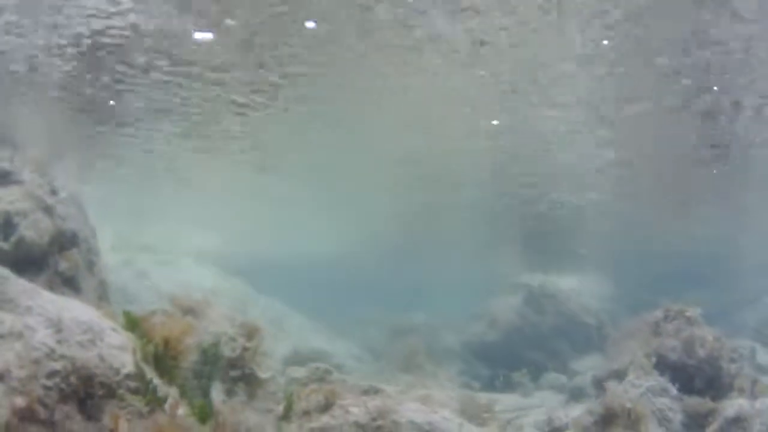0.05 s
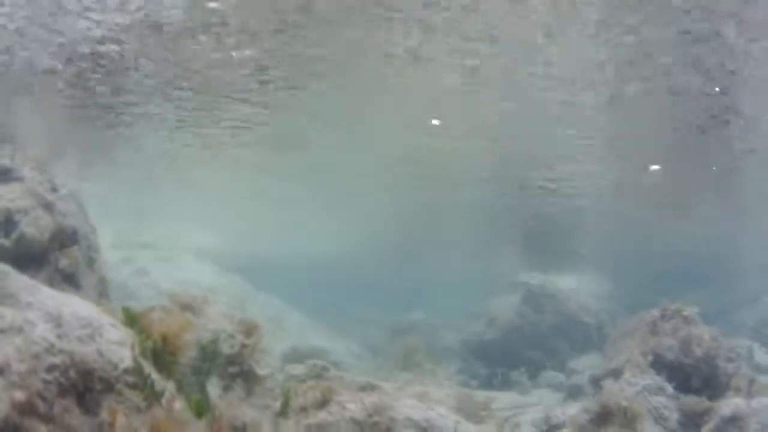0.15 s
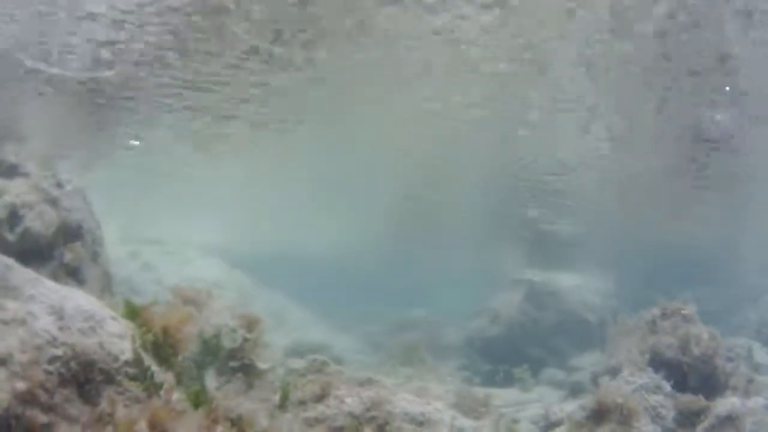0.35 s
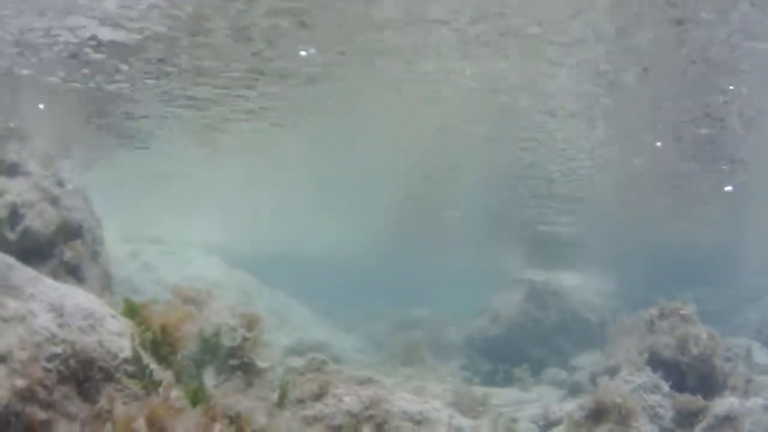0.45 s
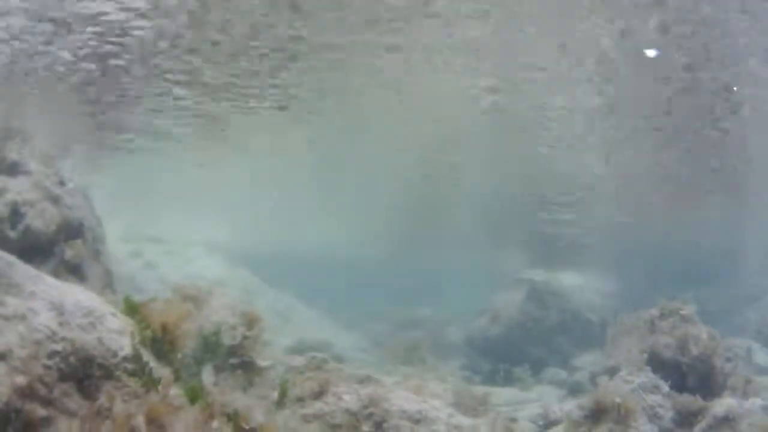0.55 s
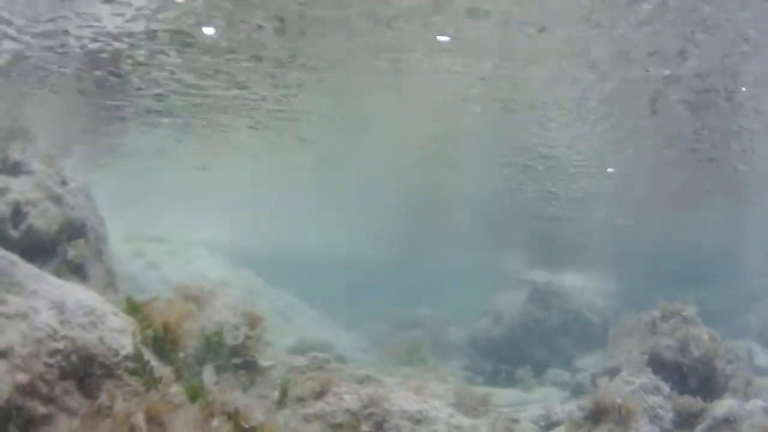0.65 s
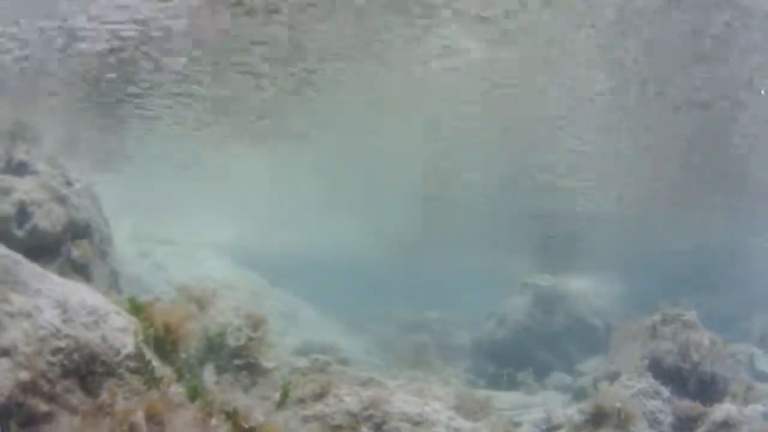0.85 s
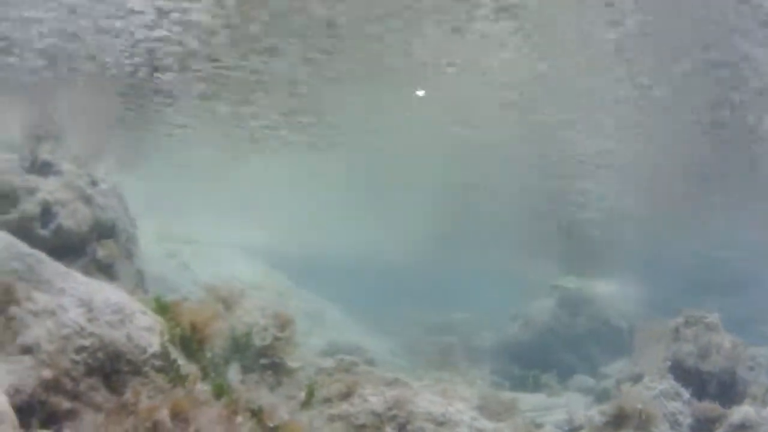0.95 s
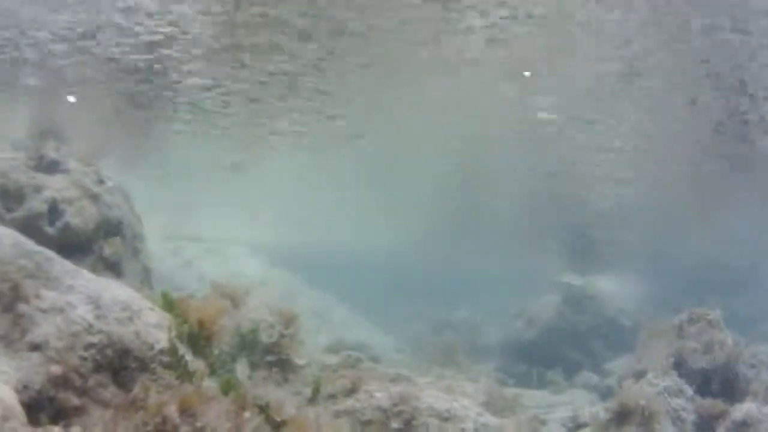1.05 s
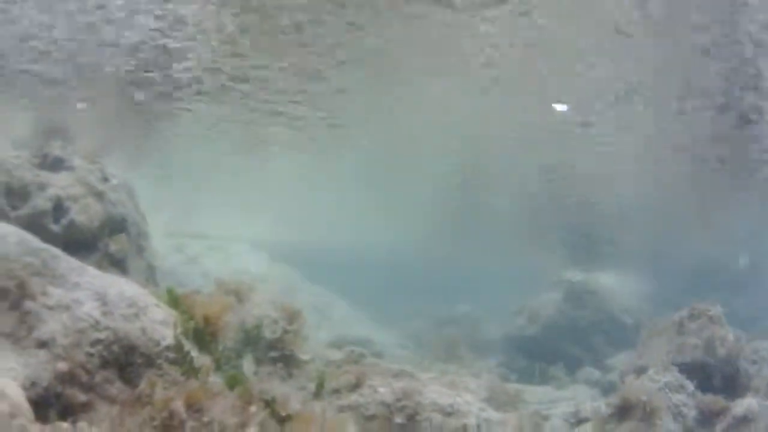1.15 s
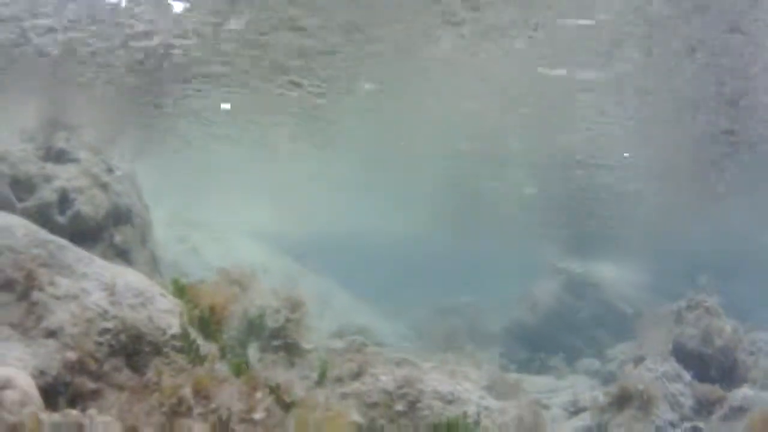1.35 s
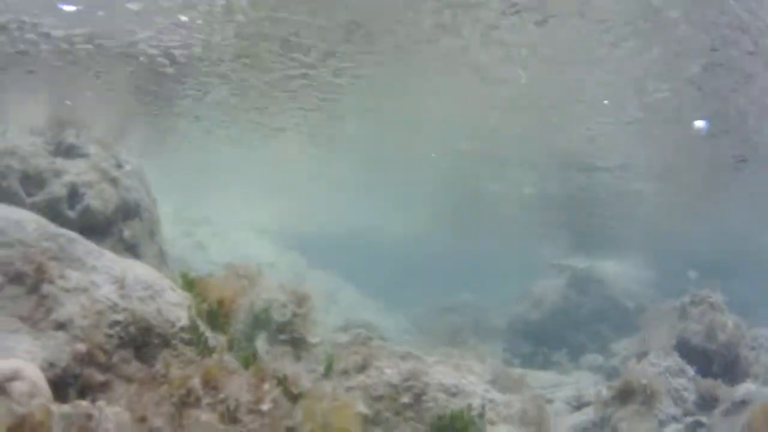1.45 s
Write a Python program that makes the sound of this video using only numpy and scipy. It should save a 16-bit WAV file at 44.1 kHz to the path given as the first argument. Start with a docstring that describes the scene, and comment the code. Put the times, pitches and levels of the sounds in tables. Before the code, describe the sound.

Irregular ticking heard underwater, with a low water rumble and one soft, deep thump.

```python
"""Ticks in shallow water

A camera lies under shallow, surging water among rocks. Sharp, uneven ticks, likely grit and small
snaps close by, make its case ring over a faint crackle. Thin pings, likely tiny bubbles, follow the
strongest ticks. Moving water rumbles on the case and gives one soft, deep thump; the recorder hisses."""
import sys
import numpy as np
from scipy import signal
from scipy.fft import rfft, irfft
from scipy.io import wavfile
from scipy.ndimage import uniform_filter1d

SR = 44100
rng = np.random.default_rng(int(sys.argv[2]) if len(sys.argv) > 2 else 0)


def transcribe(u):
    """Save the signal u as a 16-bit wav file named by the first command-line argument.

    u: samples, shape (n,) or (channels, n), limited to [-1, 1]; the rate is SR.
    q: integer samples, one column per channel.
    """
    v = np.clip(np.atleast_2d(u).T, -1, 1)
    q = np.round(v * 32767).astype(np.int16)
    wavfile.write(sys.argv[1], SR, q)


N = 66150

# tone colour of the hiss, the rumble and the wash of water: f/Hz, relative level/dB
HISS_SPECTRUM = [(300, 0), (1300, -1), (2500, 1), (4000, -2.1), (6500, -2), (9000, -1.9), (11000, -2.6)]
RUMBLE_SPECTRUM = [(15, -3), (28, -9), (40, 4.5), (58, -11), (95, -11.5), (140, -20), (200, -23.5),
                   (300, -47.5), (600, -58.5)]
WASH_SPECTRUM = [(120, -5.5), (220, 6), (350, 3), (520, 5.5), (750, 1.5), (1000, -4.5), (1500, -10),
                 (3000, -21)]
# how loud the rumble is as the water surges: t/s, level/dB
SURGE_LEVELS = [(0, -45.5), (.06, -47), (.16, -38.5), (.3, -40.5), (.39, -48.5), (.5, -41.5), (.55, -42.5),
                (.66, -42.5), (.8, -44), (.89, -37), (.94, -47), (.99, -35), (1.07, -46), (1.15, -42),
                (1.23, -49.5), (1.3, -39.5), (1.38, -48), (1.47, -44.5)]
# thin pings: t/s, f/Hz, level/dB, time to fade by 60 dB/s
BUBBLE_PINGS = [(0.9484, 3070, -47, 0.14), (1.0200, 3510, -55.5, 0.21), (1.1242, 3052, -44.5, 0.085)]
# tones the case rings with: f/Hz, relative level/dB, time to fade by 60 dB/s
CASE_TONES = [(354.9, -13.5, 0.21), (480, -7.5, 0.028), (570, -12.5, 0.052), (722, -8, 0.072),
              (827, -0.5, 0.026), (1077, -2, 0.033), (1580, -17.5, 0.025), (1820, -7, 0.02),
              (2053, -4, 0.024), (2359, -2.5, 0.043), (2933, 0.5, 0.018), (3350, -11.5, 0.032),
              (3900, -10.5, .024), (4510, -6.5, 0.049)]
# edges and centres of the six bands that shape a tick, low to high: f/Hz
BAND_EDGES = [250, 600, 1300, 2200, 2700, 3700, 9600]
BAND_CENTRES = [400, 900, 1800, 2400, 3050, 4600]
# a typical faint tick of the crackle: level/dB for each of the six bands
CRACKLE_LEVELS = [-64, -74, -80, -80.5, -78.5, -92]
# the clear ticks: t/s, then level/dB for each of the six bands
CLEAR_TICKS = [(0.1082, -55, -71, -68, -56, -64.5, -80), (0.1202, -49, -52, -84, -63, -71, -69),
               (0.1315, -67, -60, -73, -55.5, -63, -70), (0.152, -68, -72, -66, -69, -66, -76),
               (0.2364, -51, -61, -72, -80, -78, -83), (0.402, -64, -74, -58.5, -83, -60, -76),
               (0.47, -72, -73, -65.5, -69.5, -73, -72), (0.5171, -46.5, -62.5, -53.5, -52, -56.5, -60.5),
               (0.569, -69, -71, -66, -57, -54, -74), (0.693, -66, -61, -59, -67, -58.5, -76),
               (0.7004, -55.5, -68, -68.5, -74, -66, -69), (0.7228, -62.5, -61, -60.5, -54, -57.5, -63.5),
               (0.735, -56.5, -57.5, -66, -63, -64, -66), (0.7802, -69, -77, -85, -56.5, -67, -67),
               (0.854, -49.5, -55.5, -61, -63, -50.5, -66), (0.9002, -56.5, -66, -80, -64, -72, -80),
               (0.946, -60, -57, -47, -50.5, -46.5, -51), (1.0197, -58.5, -50, -48.5, -51.5, -42, -53.5),
               (1.0985, -51.5, -62.5, -72, -78, -78, -83), (1.1255, -50, -41.5, -43.5, -46.5, -52, -50),
               (1.169, -53, -64, -73, -84, -73, -76), (1.215, -62.5, -51.5, -59.5, -55.5, -62.5, -52.5),
               (1.2443, -93, -70, -70, -65, -61, -71), (1.3025, -49, -56, -66, -57, -62, -67)]


def undb(db):
    """Turn decibels into a gain."""
    return 10 ** (np.asarray(db) / 20)


def unit(x):
    """Scale a signal to an average strength (rms) of 1."""
    return x / np.sqrt(np.mean(x ** 2))


def fade(t, t60):
    """Die away smoothly, 60 dB down after t60 seconds."""
    return np.exp(-np.log(1000) * t / t60)


def noise(spectrum):
    """Noise of strength 1 with the given tone colour."""
    hz, db = np.array(spectrum).T
    f = np.maximum(np.fft.rfftfreq(N, 1 / SR), 1)
    gain = undb(np.interp(np.log(f), np.log(hz), db))
    return unit(irfft(rfft(rng.standard_normal(N)) * gain, N))


def wander(per_s):
    """A smooth random drift of strength 1."""
    width = int(SR / per_s)
    return unit(uniform_filter1d(uniform_filter1d(rng.standard_normal(N), width), width))


def add(out, sound, start_s):
    """Mix a sound in at the given time."""
    i = max(int(start_s * SR), 0)
    out[i:i + len(sound)] += sound[:max(N - i, 0)]


def colour(x, hz, db):
    """Turn each frequency up or down while keeping a sudden start sharp."""
    n = len(x)
    f = np.maximum(np.fft.rfftfreq(n, 1 / SR), 1)
    gain = undb(np.interp(np.log(f), np.log(hz), db))
    cepstrum = irfft(np.log(gain), n)
    cepstrum[1:n // 2] *= 2  # folded forward in time, so nothing sounds before the hit
    cepstrum[n // 2 + 1:] = 0
    return irfft(rfft(x) * np.exp(rfft(cepstrum)), n)


def band_levels(x):
    """Level in dB of a short sound in each band, as if its energy were spread over 15 ms."""
    f = np.fft.rfftfreq(len(x), 1 / SR)
    energy, _ = np.histogram(f, BAND_EDGES, weights=2 * abs(rfft(x)) ** 2 / len(x))
    return 10 * np.log10(energy / (.015 * SR))


def hiss(level_db=-59):
    """The recorder adds its own steady noise."""
    return undb(level_db) * noise(HISS_SPECTRUM)


def water(t, wash_db=-62, hum_db=-71.5, hum_width_hz=36, waver_db=2):
    """Surging water rumbles on the case; a wavering wash makes its lowest tone hum."""
    flow = noise(RUMBLE_SPECTRUM)
    even_flow = flow / np.sqrt(uniform_filter1d(flow ** 2, size=SR // 10))
    rumble = even_flow * undb(np.interp(t, *np.array(SURGE_LEVELS).T))
    wash = undb(wash_db) * noise(WASH_SPECTRUM)
    hum_hz = CASE_TONES[0][0]
    resonance = signal.iirpeak(hum_hz, hum_hz / hum_width_hz, fs=SR)
    hum = undb(hum_db) * unit(signal.lfilter(*resonance, rng.standard_normal(N)))
    return rumble + (wash + hum) * undb(waver_db * wander(per_s=7.1))


def thump(t, at_s=.244, sink_s=.0089, flip_s=.0018, relax_s=.013, gain_db=-12):
    """Water pushes once on the case: the pressure sinks, flips over quickly and relaxes."""
    age = t - at_s
    swing = np.sign(age) * np.exp(-np.maximum(age / relax_s, -age / sink_s))
    rounding = signal.windows.gaussian(SR // 20 + 1, flip_s * SR)
    return undb(gain_db) * signal.fftconvolve(swing, rounding / rounding.sum(), "same")


def crackle(per_s=22, spread_db=4.5):
    """Faint ticks come at random times, some louder and some softer."""
    out = np.zeros(N)
    for _ in range(int(per_s * N / SR)):
        band_db = np.array(CRACKLE_LEVELS) + spread_db * rng.standard_normal()
        add(out, tick(band_db), rng.uniform(0, N / SR))
    return out


def pings(t):
    """Each ping, likely a tiny bubble, is one fading tone."""
    out = np.zeros(N)
    for start, hz, db, t60 in BUBBLE_PINGS:
        add(out, undb(db) * fade(t, t60) * np.sin(2 * np.pi * hz * t), start)
    return out


def case_ring(t, scatter_db=1, detune=.005):
    """The case rings with all its tones, their level and pitch a little different each time."""
    hz, db, t60 = np.array(CASE_TONES).T[:, :, None]
    level_draw, pitch_draw = rng.standard_normal((2, len(CASE_TONES), 1))
    tones = np.sin(2 * np.pi * hz * (1 + detune * pitch_draw) * t)
    return (undb(db + scatter_db * level_draw) * fade(t, t60) * tones).sum(0)


def tick(band_db, spike_s=.0001, echo_s=.0033, echo_db=-24):
    """A pressure spike and a brief crack ring the case and echo off the surface just above."""
    t = np.arange(4096) / SR
    ring = case_ring(t)
    spike = undb(11) * (1 - t / spike_s) * np.exp(-t / spike_s)
    crack = rng.standard_normal(len(t)) * (undb(6) * fade(t, t60=.008) + undb(-3) * fade(t, t60=.05))
    snap = spike + crack
    sound = snap + ring
    add(sound, -undb(echo_db) * snap[:len(t) // 2], echo_s)  # the surface flips the wave over
    gain_db = np.array(band_db) - band_levels(sound)  # move each band toward its wanted level
    bass_db, treble_db = gain_db[0] - 22, gain_db[-1] - 5.5  # turn both ends down
    return colour(sound, hz=[77, *BAND_CENTRES, 5130], db=[bass_db, *gain_db, treble_db])


def clear_ticks():
    """Sharp ticks close by, likely grit and small snaps, each with its own tone colour."""
    out = np.zeros(N)
    for start, *band_db in CLEAR_TICKS:
        add(out, tick(band_db), start)
    return out


def scene():
    """Mix all the sounds into one channel."""
    t = np.arange(N) / SR
    return (water(t) + thump(t) + hiss() + clear_ticks() + crackle() + pings(t))[None]


def record(dry):
    """The camera steeply cuts off the highest treble."""
    top_hz = 9650
    return signal.sosfilt(signal.ellip(12, .2, 80, top_hz, fs=SR, output="sos"), dry)


dry = scene()
out = record(dry)
transcribe(out)
```